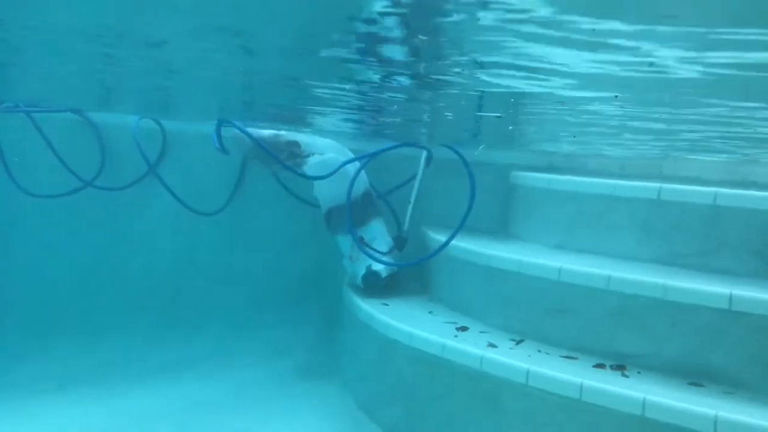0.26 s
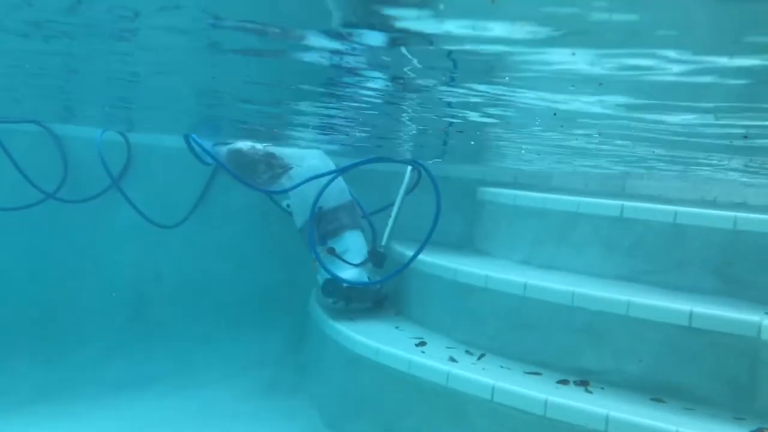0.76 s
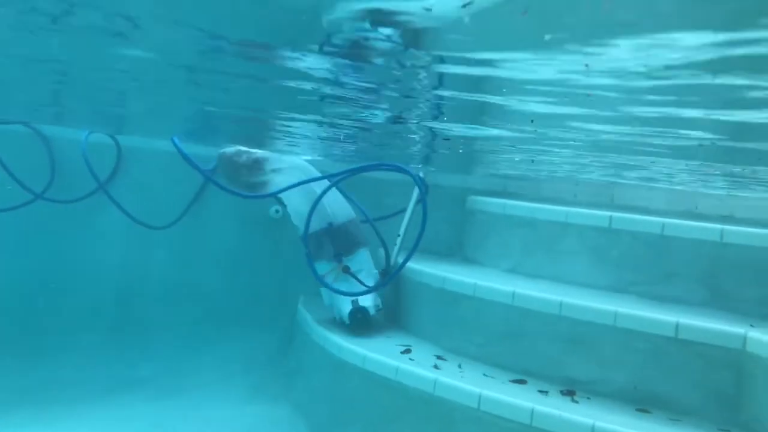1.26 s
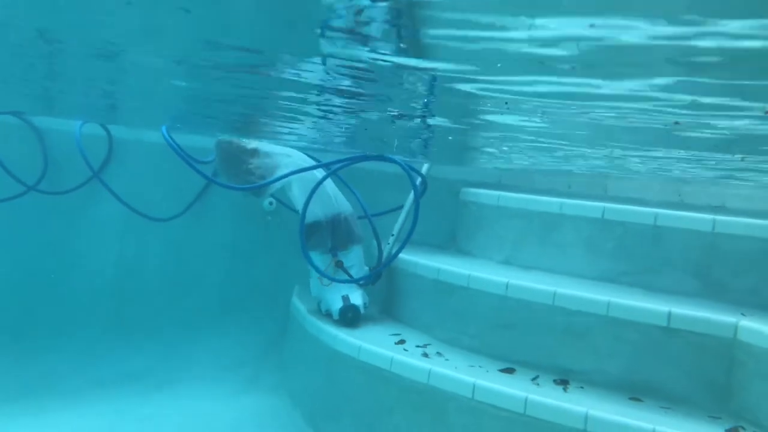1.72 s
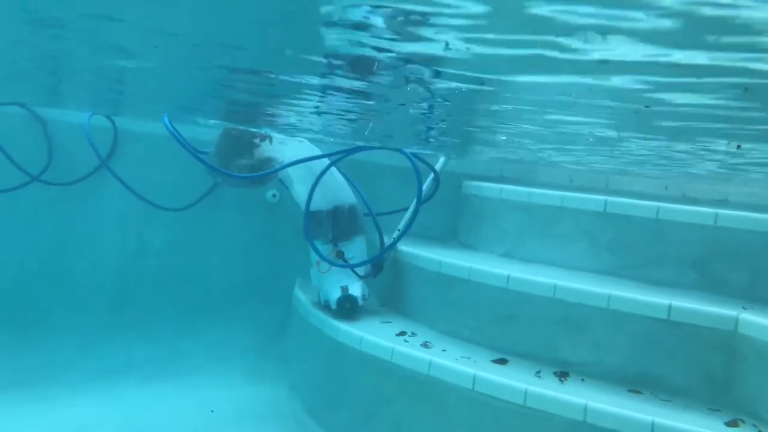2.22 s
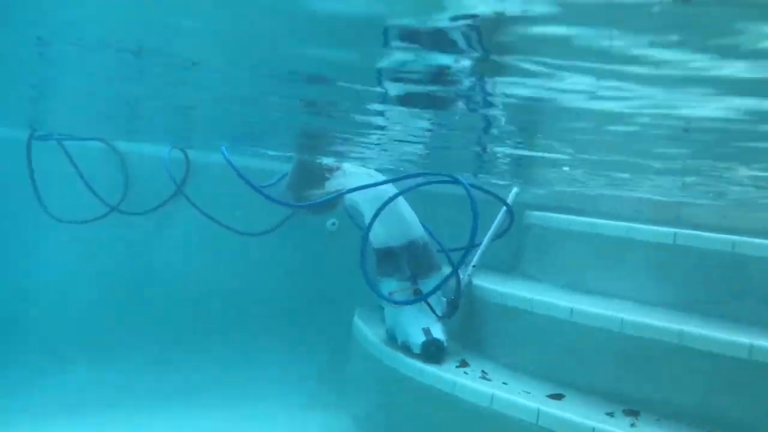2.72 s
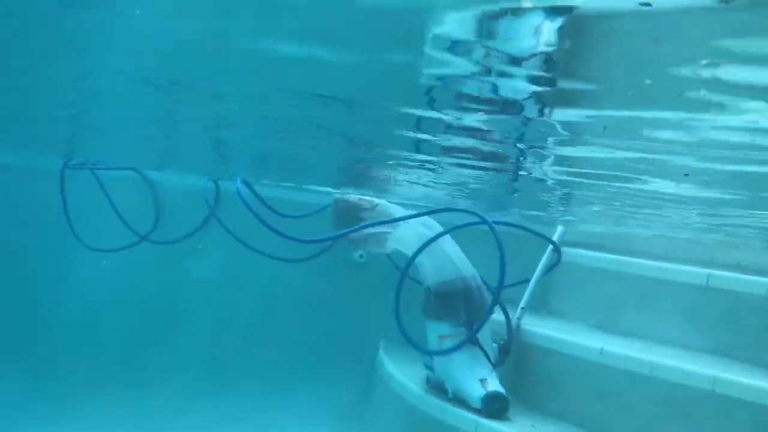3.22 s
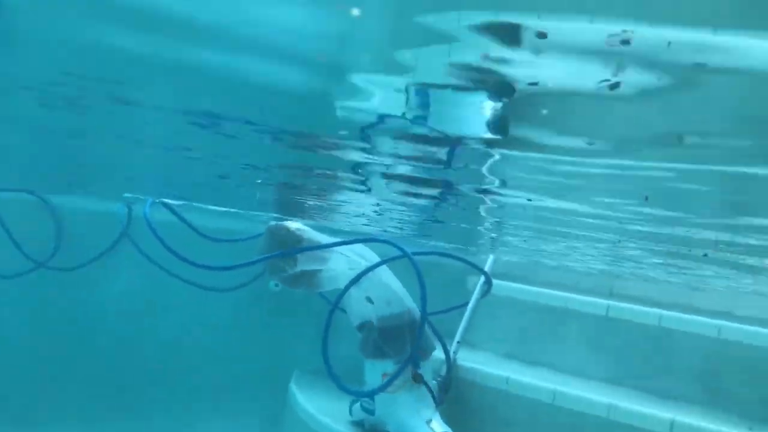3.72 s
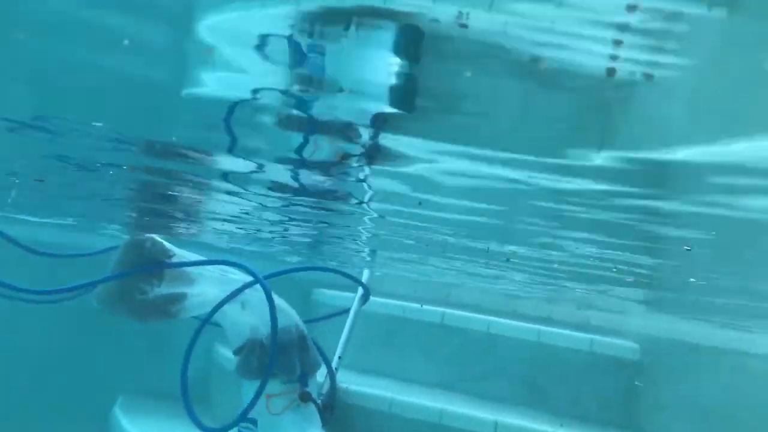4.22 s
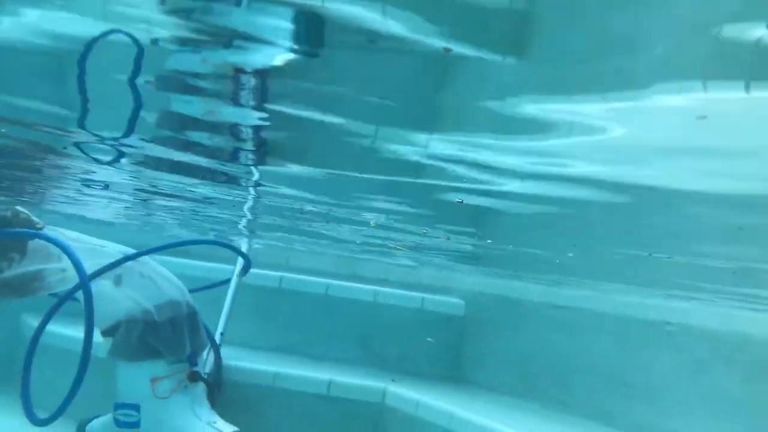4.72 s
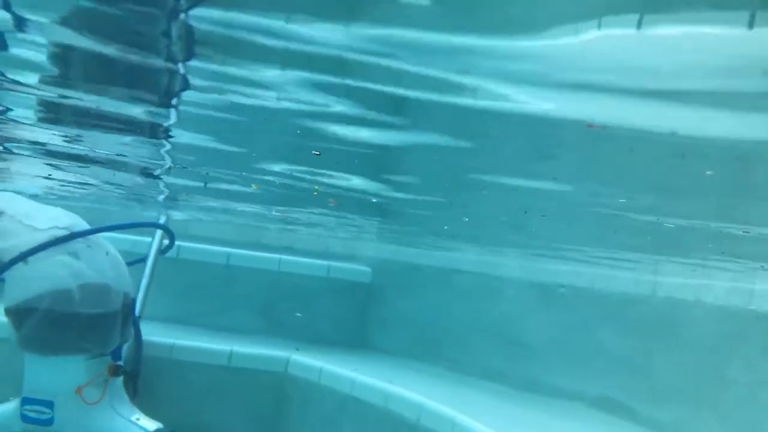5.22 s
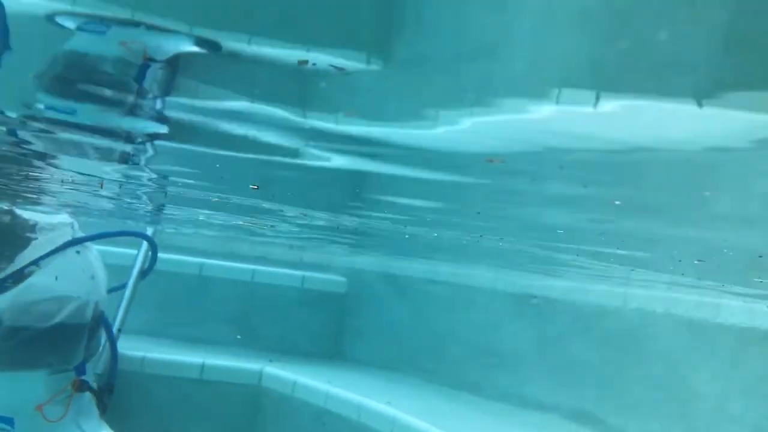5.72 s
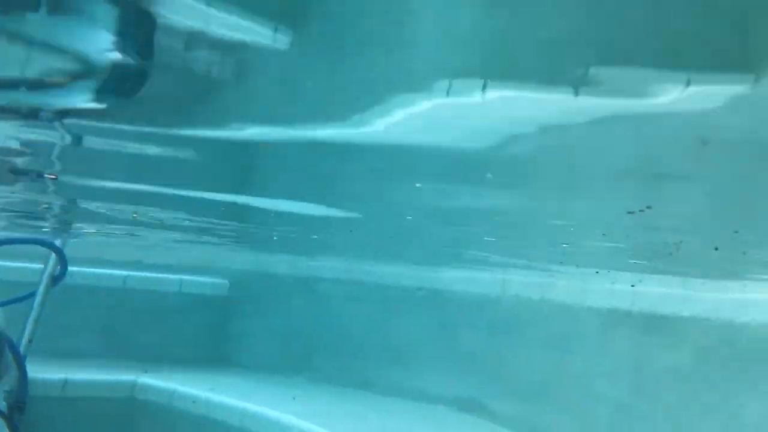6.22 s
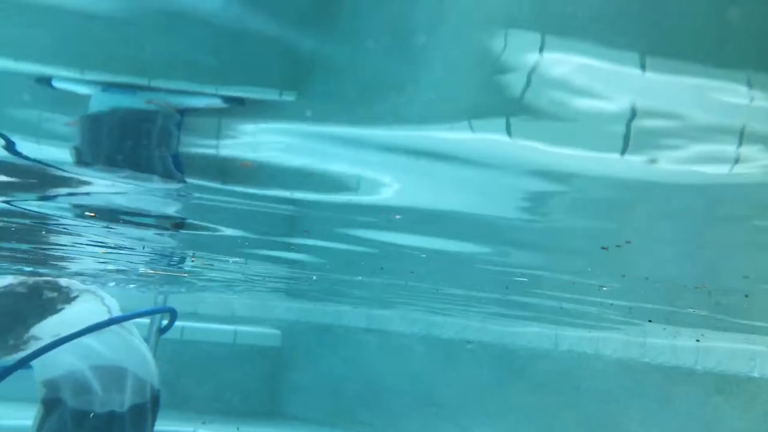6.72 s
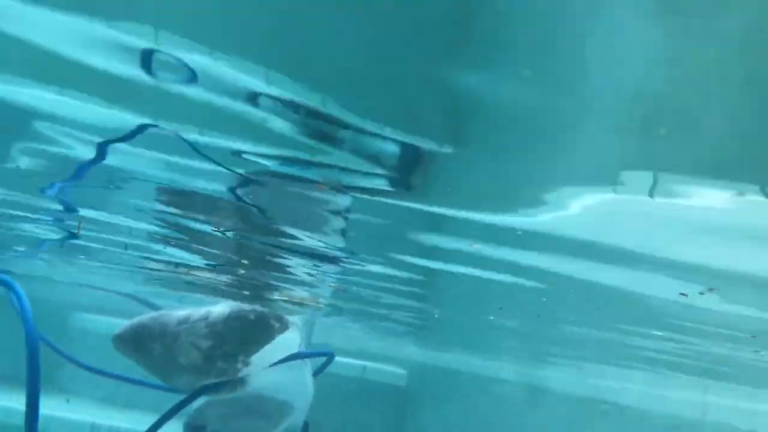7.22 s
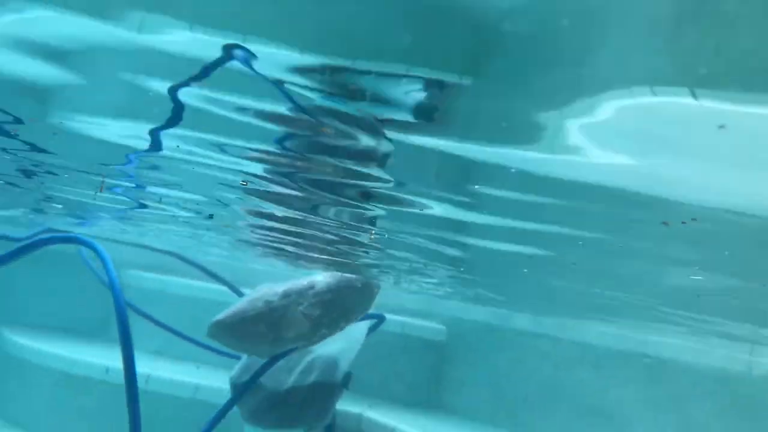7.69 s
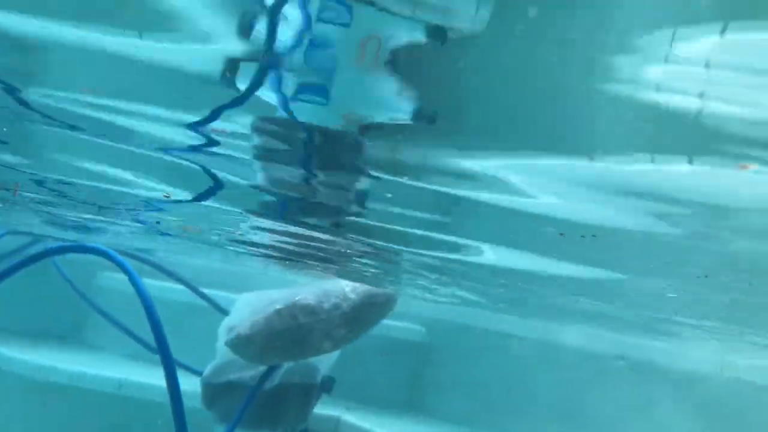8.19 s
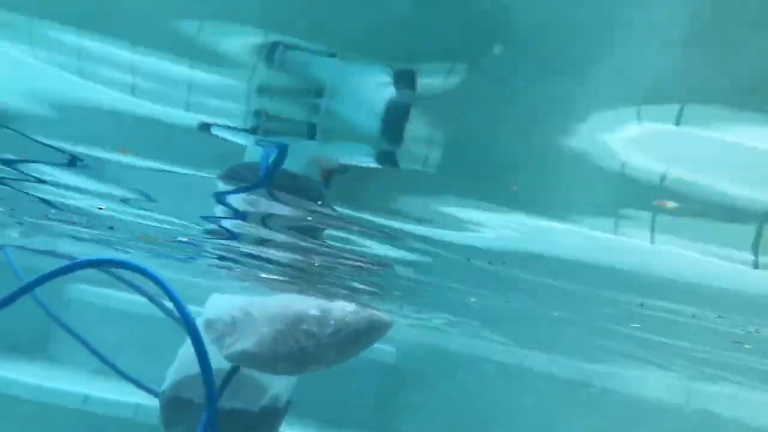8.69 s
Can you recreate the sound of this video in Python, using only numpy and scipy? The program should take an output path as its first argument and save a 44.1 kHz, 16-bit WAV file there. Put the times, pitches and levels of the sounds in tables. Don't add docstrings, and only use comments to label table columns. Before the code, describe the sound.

A continuous gritty pump rush, with a nasal whine around one kilohertz and fine hiss above, fills the whole nine seconds, heard close and boxy from inside a sealed case underwater in a pool. At 0.4 s comes a light knock and soft rubbing, with watery thumps and a faint sliding squeak until about 1.6; a hard knock lands at 1.4. It is calmer until 2.7, when a very loud knock opens a busy stretch of bumps, rubs, ticks and taps lasting to about 4. Sparse clicks and clinks follow. At 5.2 a loud multiple bump with a short scrape hits. From 5.85 to 6.6 there are knocks, bubble pops and low gulps; from 6.7 to 7.1 a rapid rattling clatter with deep thumps. Afterward only small ticks, bubbles and the duller, shifting rush remain, with low rumbling swelling near the end. The background dips briefly after hard hits.

```python
import sys
import numpy as np
from scipy import signal
from scipy.fft import rfft, irfft, next_fast_len
from scipy.io import wavfile
from scipy.ndimage import uniform_filter1d

SR = 44100
rng = np.random.default_rng(int(sys.argv[2]) if len(sys.argv) > 2 else 0)


def gain_from_decibels(decibels):
    exponent = np.asarray(decibels, float) / 20
    return 10 ** exponent


def materialize(psi):
    bounded = np.clip(np.atleast_2d(psi).T, -1, 1)
    quanta = np.round(bounded * 32767).astype(np.int16)
    wavfile.write(sys.argv[1], SR, quanta)


N = 394694

# (frequency [Hz], width [Hz], level [dB])
SHELL = [(57.7, 46, 3), (148.5, 69, -2.5), (210, 75, 0.5), (252, 94, -0.5), (490, 92, -2.5),
         (669, 90, -4.5), (750, 214, -10)]
CAVITY = [(1033, 87, 10.5), (1124, 167, -2.5), (1203, 108, 0.5)]
WINDOW = [(1250, 125, 7.5), (1430, 41, 2.5), (1521.4, 67, 2), (1689, 90, -1)]
FRAME = [(1970, 440, 6), (2170, 317, 7.5), (2700, 330, -7), (3240, 330, -5), (3370, 1420, -13)]
# (frequency [Hz], width [Hz], level [dB])
PORT = [(1180, 31, 0)]
# (frequency [Hz], width [Hz], level [dB])
HUM = [(239.6, 15, 0)]
# (frequency [Hz], width [Hz], level [dB])
FINGERED_FRAME = [(2090, 94, 2), (2380, 96, -4), (2700, 17, -6), (3270, 22, -12), (4360, 64, -18),
                  (5320, 96, -24)]
# (frequency [Hz], width [Hz], level [dB])
PALM_MODES = [(2650, 290, 2), (3270, 180, 2.5), (4450, 520, -14), (5430, 420, -15)]
# (frequency [Hz], width [Hz], level [dB])
RIM_MODES = [(1675, 72, 2), (1810, 110, -9)]

# (frequency [Hz], density [dB per Hz])
FIZZ = [(2350, -30), (4000, -14), (4540, -4), (4900, -16), (5600, -3.5), (6630, -13), (8550, -5.5),
        (10100, -14.5), (11400, -22), (12800, -11), (16000, -35)]
FIZZ_AWAY = [(2350, -27), (4000, -5.5), (5730, -16), (6550, -18.5), (8310, -11), (10500, -15.5),
             (10800, -10), (11700, -7), (12600, -14.5), (13500, -18), (15700, -21), (16000, -31)]
# (frequency [Hz], density [dB per Hz])
CRACK = [(2500, 9), (4000, 0), (7100, -8.5), (8300, -6), (9800, -12.5), (11800, -10.5), (13200, -15),
         (15900, -21)]

# (time [s], turn away from the pump [0-1.3], stirring of the water [dB])
HAND = [(0, 0.3, 2.5), (.79, 0.29, 0.5), (1.39, 0.33, 1), (2.34, 0.29, 2.5), (2.99, 0.26, 10.5),
        (3.32, 0.32, 7), (3.9, 0.23, 5.5), (4.29, 0.32, 4), (5.06, 0.59, 4), (5.43, 0.47, 2),
        (5.96, 0.69, 6), (6.25, 0.58, 4.5), (6.45, 0.6, 1.5), (6.86, 0.69, 5), (7.25, 0.89, 4),
        (8.23, 0.78, 1.5), (8.6, 1, 6.5), (8.95, 1.12, 13.5)]
# (time [s], frequency [Hz])
SQUEEZE = [(0.0, 1109), (1.99, 1070), (2.64, 1074), (3.99, 1057), (6.48, 1073), (6.88, 1036), (7.13, 1043),
           (8.62, 1053), (8.95, 1044)]
# (time [s], push [dB])
PUSH = [(0, 10), (.67, 6), (1.35, 5.5), (2.49, -6.5), (2.96, 10.5), (3.5, -3), (3.84, -7.5), (5.73, 1),
        (5.98, 13), (6.45, 8), (6.83, 17), (7.2, 4.5), (8.57, 9.5), (8.95, 16.5)]
# (best level [dB], best turn [1], loss [dB per turn squared],
# share of stirring [1])
FACING = [
    (-27.5, .01, 4.5, 0.1),
    (-29, 0.74, 37.5, 0.18),
    (-25, 1.562, 9.5, 0.086),
    (-46.5, 0.56, 24.5, 0.9),
]
# (rest level [dB], share of push [1], share of stirring [1],
# tilt [dB per turn])
ROCKING = [
    (-46.5, 0.44, -0.34, 3),
    (-45.5, 0.89, 0.12, -11.5),
    (-48, 0.022, -0.044, 9),
]

# (time [s], frame level [dB], length [s],
# relative treble [dB])
RUBS = [(0.398, -49.5, 0.61, -9), (0.659, -43, 0.24, -13.5), (1.405, -37, 0.018, -23),
        (2.718, -25.5, 0.057, -13), (2.776, -41.5, 0.11, -24), (2.94, -36.5, 0.047, -11),
        (3.283, -51.5, 0.017, 7), (3.406, -36, 0.054, -18), (3.448, -33, 0.052, -27),
        (3.47, -30, 0.046, -15.5), (3.589, -38.5, 0.013, -12), (5.209, -28, 0.07, -15),
        (5.239, -36.5, 0.13, -13), (5.872, -36.5, 0.047, -20), (6.082, -39.5, 0.038, -9.5),
        (6.442, -36.5, 0.18, -18), (6.514, -40, 0.031, -17), (6.695, -28, 0.022, -23),
        (6.755, -36, 0.06, -15), (6.836, -29.5, 0.067, -14), (6.909, -27.5, 0.052, -19),
        (6.945, -44, 0.008, -24),
        (3.285, -53, 0.02, -11),
    (3.589, -44, 0.054, -23),
    (3.69, -50.5, 0.022, -8),
    (3.879, -48, 0.022, -3),
    (6.699, -40, 0.046, -9),
    (6.775, -37.5, 0.076, -24),
    (6.852, -35.5, 0.17, -16),
    (6.901, -38, 0.022, -17),
    (6.956, -45, .035, -22),
]
# (time [s], peak [dB], pitch [Hz], rattle T60 [s])
KNOCKS = [(.388, -16.5, 1197, 0.23), (1.384, -3, 1496, 0.062), (2.721, -2.5, 1070, 0.099),
          (2.76, -6.5, 1134, 0.061), (2.96, -10.5, 1147, 0.074), (2.982, -12.5, 1060, 0.063),
          (3.417, -13.5, 1047, 0.1), (3.454, -7, 1180, 0.034), (3.479, -6.5, 1010, 0.071),
          (3.497, -3.5, 1070, 0.048), (3.575, -19, 1220, 0.023), (3.76, -9.5, 1060, 0.088),
          (3.826, -13, 1060, 0.074), (3.922, -11, 1050, 0.095), (4.486, -13, 1070, 0.064),
          (5.221, -9.5, 766, 0.06), (5.218, -1, 1430, 0.05), (5.218, -3.5, 920, 0.022),
          (5.257, -7, 1030, 0.07), (6.034, -13.5, 1500, 0.098), (6.065, -8, 1155, 0.048),
          (6.164, -6.5, 1460, 0.16), (6.519, -11.5, 1500, 0.045), (6.523, -11, 1320, 0.041),
          (6.686, -14.5, 1290, 0.032), (6.756, -13.5, 1430, 0.1), (6.837, -12.5, 1280, 0.06),
          (6.889, -8, 1320, 0.03), (6.929, -7, 990, 0.015)]
# (time [s], peak [dB], pitch [Hz])
RATTLES = [(1.401, -18, 1140), (2.7271, -5.5, 1060), (2.699, -15, 1120), (2.765, -9.5, 1100),
           (3.486, -20, 1070), (5.212, -8, 1130), (5.224, -1.5, 1300), (5.232, -5, 1250),
           (6.695, -8.5, 1250), (6.775, -9.5, 1230), (6.862, -10, 1310), (6.918, -14, 1420),
           (6.933, -9.5, 1060), (6.964, -14, 1310), (7.04, -13, 1250)]
# (time [s], peak [dB])
TAPS = [(1.444, -22), (2.753, -13), (2.898, -19), (2.943, -17), (3.109, -27), (3.184, -27), (3.463, -14),
        (3.543, -34), (3.806, -22), (4.263, -23), (4.461, -18.5), (4.833, -17.5), (5.86, -14),
        (5.913, -13.5), (5.934, -11.5), (6.486, -12)]
# (time [s], peak [dB])
NUDGES = [(3.123, -19), (3.196, -16), (3.2414, -18), (3.2743, -21), (3.312, -20), (3.3357, -15),
          (3.362, -16), (3.599, -16), (3.6324, -23), (3.692, -20), (3.703, -16.5), (3.772, -30),
          (3.9036, -17.5), (4.05, -24)]
# (time [s], peak [dB], pitch [Hz])
FLICKS = [(2.7361, -2.5, 1120), (2.767, -18, 1100), (2.773, -10, 1160), (3.106, -15, 1180),
          (3.4096, -8, 1180), (3.471, -11, 1110), (3.5394, -18, 1200), (3.567, -10, 1250),
          (3.7353, -19, 1210), (3.8036, -11.5, 1170), (3.95, -18, 1170), (4.262, -12.5, 1180),
          (5.1933, -5.5, 1190), (6.485, -9.5, 1250), (5.2611, -10, 1160), (6.571, -19, 1250),
          (6.752, -13, 1370), (6.82, -12, 1400), (6.885, -6.5, 1320), (6.906, -6.5, 1320)]
# (time [s], peak [dB], pitch [Hz])
TICKS = [(1.5284, -28, 2680), (1.5277, -33, 4400), (7.039, -29.5, 4730), (2.7212, -7.5, 2040),
         (2.9425, -23.5, 2240), (3.221, -29, 2150), (3.412, -16.5, 2090), (3.484, -22.5, 2040),
         (3.704, -24.5, 2140), (3.7329, -22.5, 2170), (3.7582, -23.5, 2300), (3.8212, -26.5, 2440),
         (3.921, -14, 2155), (4.26, -26, 2680), (5.2096, -15, 2450), (6.164, -20, 2220),
         (6.9124, -24, 2170), (6.958, -21, 2300), (7.038, -16.5, 2940), (7.166, -30, 2090),
         (8.6116, -33, 2287), (8.739, -35, 2940)]
# (time [s], peak [dB], pitch [Hz])
CLINKS = [(0.3655, -32.5, 3200), (1.3823, -24, 2400), (1.6212, -33, 2170), (2.4926, -31, 2060),
          (2.5526, -28.5, 2010), (3.048, -27.5, 2170), (3.4545, -21, 2170), (3.5954, -26, 2180),
          (3.9486, -26, 2178), (3.9974, -26.5, 2060), (4.4997, -21.5, 2050), (4.7077, -26, 2110),
          (4.9794, -20, 2170), (5.2228, -11, 2110), (5.8646, -21, 2170), (6.485, -31, 2250),
          (6.687, -28.5, 2220), (7.016, -27, 2400), (7.207, -32, 2070), (7.4914, -30.5, 2090),
          (7.9527, -26, 2210), (8.06, -34, 2240)]
# (time [s], peak [dB], pitch [Hz])
CRACKLES = [(2.815, -35, 3300), (2.8959, -31, 2500), (2.9907, -30, 2700), (3.0874, -36, 2380),
            (3.1089, -30.5, 2300), (3.3184, -37, 2470), (3.3793, -37, 3160), (3.498, -24.5, 2300),
            (3.5659, -28, 2350), (3.7983, -41, 2250), (3.9714, -35, 2900), (6.7656, -36, 2680),
            (6.784, -34, 2210), (6.8364, -28, 2340), (6.8628, -29, 2320), (6.9053, -23, 2230),
            (6.9192, -19, 2170), (6.968, -33, 2700), (7.016, -31, 2600), (7.031, -29, 2650),
            (7.0694, -35, 2600), (7.0893, -35, 2320)]
# (time [s], peak [dB], pitch [Hz])
STRAYS = [(0.048, -37, 2640), (0.1381, -54, 2610), (0.3027, -49, 2660), (0.4933, -45, 2780),
          (0.5357, -42, 3330), (0.607, -39, 3270), (0.7542, -35, 2660), (1.0036, -50, 2820),
          (1.0904, -39, 3270), (1.3054, -42, 2600), (1.3359, -41, 2640), (1.6846, -44, 2650),
          (1.941, -45, 3050), (2.1191, -42, 2600), (2.3131, -43, 2730), (2.4004, -42, 2670),
          (5.3258, -32, 2755), (5.4281, -45, 2745), (5.7553, -47, 2597), (5.8272, -38, 3680),
          (5.9354, -39, 2730), (5.9708, -36, 2710), (6.0901, -39, 2650), (6.2118, -37, 2760),
          (6.4602, -36, 2700), (7.3153, -46, 2710), (7.4006, -45, 3130), (7.9137, -33, 2300),
          (8.1095, -41, 2780), (8.2671, -42, 2970), (8.4073, -41, 2867), (8.4467, -43, 2890)]
# (time [s], peak [dB], pitch [Hz])
PINGS = [(.056, -45, 5230), (.2668, -41, 4100), (.322, -46, 4560), (.793, -42, 4160), (0.864, -35, 2500),
         (2.0646, -31, 2530), (3.2377, -37, 2700), (3.858, -36, 3680), (4.1024, -38, 2770),
         (4.563, -43, 2580), (5.294, -35, 3270), (6.985, -44, 5300), (7.5433, -41, 2570),
         (7.565, -33.5, 2630), (7.9702, -45, 3210), (8.139, -39, 3050)]
# (time [s], peak [dB])
SNAPS = [(.165, -41), (.174, -43), (.22, -44), (.366, -44), (.4025, -36.5), (1.3808, -29), (1.5264, -27),
         (2.0622, -36), (2.7217, -16), (2.7691, -26), (2.9412, -30), (2.9627, -31), (3.1832, -36),
         (3.237, -32), (3.3787, -32), (3.4101, -26.5), (3.4506, -30), (3.7559, -26.5), (3.8182, -33),
         (3.9195, -32.5), (3.9694, -33), (4.2607, -31.5), (4.4892, -36), (5.0704, -37), (5.887, -37),
         (6.0636, -30), (6.1619, -35), (6.9551, -26), (7.0374, -27), (7.0868, -32.5), (7.1651, -30),
         (8.6103, -32), (8.7375, -28.5)]
CREAKS = [0.0, 0.424, 0.695, 2.9287, 2.949, 3.2894, 3.4775, 3.491, 3.503, 3.6057, 4.979, 5.2093, 5.219,
          5.242, 5.259, 5.293, 6.5091, 6.6124, 6.6937, 6.764, 6.782, 6.8409, 6.853, 6.865, 6.884, 6.9102,
          6.93, 8.2325, 8.6323]
# (time [s], peak [dB], pitch [Hz])
THUMPS = [(0.541, -26.5, 225), (0.628, -25, 247), (.669, -22.5, 243), (0.718, -32, 250), (1.017, -35, 75.4),
          (1.051, -30, 152), (1.39, -26, 212), (1.75, -35, 68.5), (2.19, -35.5, 76), (2.69, -24, 212),
          (2.723, -22, 160.5), (2.948, -26.5, 168), (3.098, -31.5, 164), (3.469, -26, 291),
          (3.596, -32, 299), (5.88, -25, 167), (5.92, -26, 240), (5.99, -28, 225), (6.465, -26.5, 243),
          (6.525, -26.5, 228), (6.698, -19, 224), (6.764, -22.5, 248), (6.85, -26, 232), (6.89, -18, 247),
          (7.097, -22, 44.7), (7.388, -25, 53), (8.76, -27, 238)]
# (time [s], peak [dB], pitch [Hz])
SLAPS = [(0.405, -23.5, 236), (0.451, -27, 250), (0.741, -35, 416), (.82, -31, 443), (0.912, -30, 457),
         (1.115, -30, 275), (1.329, -31, 280), (1.38, -26.5, 445), (2.684, -26, 305), (2.74, -22, 300),
         (2.77, -34, 295), (2.941, -36, 302), (3.106, -33.5, 328), (3.413, -27, 300), (3.5, -33, 198),
         (3.552, -27, 167), (4.756, -36, 286), (4.979, -31, 280), (5.153, -38, 292), (5.218, -20, 410),
         (5.84, -29, 234), (5.961, -23, 65), (6.665, -25, 90), (7.916, -30, 285), (8.774, -27, 310)]
# (time [s], peak [dB], pitch [Hz], T60 [s])
POPS = [
    (.49, -23, 890, 0.032),
    (.77, -30, 620, 0.062),
    (6.06, -27, 350, 0.046),
    (6.162, -24, 408, 0.047),
]
# (time [s], peak [dB])
GULPS = [
    (1.016, -26),
    (1.207, -32),
    (6.273, -23),
    (6.361, -33),
    (6.412, -24),
    (6.575, -30),
    (6.61, -30),
    (5.887, -24.5),
]


def evened(x):
    return x / np.sqrt(np.mean(x ** 2) + 1e-20)


def peaked(x):
    return x / np.max(abs(x))


def add(mix, s, sound):
    part = mix[max(round(s * SR), 0):][:len(sound)]
    part += sound[:len(part)]


def lit(levels_db, sounds):
    return sum(gain_from_decibels(db) * x for db, x in zip(levels_db, sounds))


def follow(table):
    s, *columns = np.transpose(table)
    return [np.interp(np.arange(N) / SR, s, column) for column in columns]


def ring(modes, size=8192):
    t = np.arange(size) / SR
    out = np.zeros(size)
    for k, (hz, width, db) in enumerate(modes):
        decay = width ** 2 * t * np.exp(-1.5 * np.pi * width * t)
        out += (-1) ** k * gain_from_decibels(db) * decay * np.sin(2 * np.pi * hz * t)
    return out / np.linalg.norm(out)


def through(x, modes):
    return signal.oaconvolve(x, ring(modes))[:len(x)]


def treble(x, spectrum=CRACK):
    size = next_fast_len(len(x), True)
    hz = np.fft.rfftfreq(size, 1 / SR)
    f, db = np.transpose(spectrum)
    shape_db = np.interp(np.log(hz + 1), np.log(f), db, -90, -90)
    return irfft(rfft(x, size) * gain_from_decibels(shape_db), size)[:len(x)]


def scrambled(x):
    return x * rng.choice([-1., 1.], len(x))


def grit(size, per_s, spread_db, share):
    heights = gain_from_decibels(spread_db * np.minimum(rng.exponential(1, size), 4))
    clicks = heights * (rng.random(size) < per_s / SR)
    clicks = evened(clicks * rng.choice([-1., 1.], size))
    return np.sqrt(share) * clicks + np.sqrt(1 - share) * rng.standard_normal(size)


def flutter(hz, depth_db):
    low_pass = signal.butter(2, hz, fs=SR)
    slow = signal.lfilter(*low_pass, rng.standard_normal(N + SR))[SR:]
    return evened(gain_from_decibels(depth_db * np.clip(evened(slow), -3, 1.8)))


def pump_fizz(turn, bubbles):
    facing_db, away_db, full_turn = -65, -63, 0.95
    angle = np.clip(turn / full_turn, 0, 1) * np.pi / 2
    facing = evened(treble(scrambled(bubbles), FIZZ))
    away = evened(treble(grit(N, 500, 3.0, 0.15) * flutter(35, 1.3), FIZZ_AWAY))
    return gain_from_decibels(facing_db) * np.cos(angle) * facing + gain_from_decibels(away_db) * np.sin(angle) * away


def cavity_ring(drive, squeeze_hz):
    wander_hz, span = 22, round(0.12 * SR)
    waver = evened(uniform_filter1d(uniform_filter1d(drive, span), span))
    turning = np.exp(2j * np.pi * np.cumsum(squeeze_hz + wander_hz * waver) / SR)
    tone = signal.hilbert(through(drive * flutter(29, 0.75), CAVITY), next_fast_len(N))[:N]
    return (tone * turning).real


def pump():
    rest_hz, port_db, port_db_per_hz = 1060, -66, 0.6838
    gap_hz, gap_width_hz, gap_depth = 1915, 31, 0.42
    turn, stir = follow(HAND)
    squeeze_hz = follow(SQUEEZE)[0] - rest_hz
    drive = grit(N, 700, 0.94, 0.2415)
    bubbles = grit(N, 300, 3.2, 0.073) * flutter(18, 2.0)
    levels = [db - loss_db * (turn - best) ** 2 + share * stir for db, best, loss_db, share in FACING]
    levels.append(port_db + port_db_per_hz * squeeze_hz)
    rush = lit(levels, (cavity_ring(drive, squeeze_hz), through(drive, WINDOW[:2]),
                        through(drive, WINDOW[2:]), through(bubbles, FRAME), through(drive, PORT)))
    gap = signal.iirpeak(gap_hz, gap_hz / gap_width_hz, SR)
    rush = rush - gap_depth * signal.filtfilt(*gap, rush)
    edge = signal.cheby2(7, 12, 925, "high", fs=SR, output="sos")
    return pump_fizz(turn, bubbles) + signal.sosfilt(edge, rush)


def rub(s, frame_db, length, treble_db):
    ragged_db, squeak = 3.2, [(3030, 800, 0)]
    t = np.arange(round(length * SR) + 3000) / SR
    grip = (1 - np.exp(-t / (0.16 * length))) * gain_from_decibels(-350 * np.maximum(t - 0.46 * length, 0))
    uneven = evened(uniform_filter1d(rng.standard_normal(len(t)), size=260))
    slip = grit(len(t), 900, 3.0, 0.6) * grip * evened(gain_from_decibels(ragged_db * uneven))
    bright = treble(scrambled(slip))
    bright *= np.linalg.norm(slip) / np.linalg.norm(bright)
    skin = 0.82 * through(slip, FRAME) + 0.72 * through(slip, FINGERED_FRAME)
    skin += 0.43 * through(scrambled(slip), squeak) + gain_from_decibels(treble_db) * bright
    body = 1.5 * through(slip, CAVITY + WINDOW) + 1.31 * through(slip, SHELL[1:])
    return s, gain_from_decibels(frame_db) * (skin + body)


def knock(s, db, hz, t60):
    t = np.arange(3072) / SR
    blow = 0.04 * rng.standard_normal(len(t)) * gain_from_decibels(-60 * t / t60)
    blow[0] = 1
    upper = through(blow, [(hz, 6.8 / t60, 0)]) + 0.61 * through(blow, CAVITY + WINDOW)
    return s - 0.0006, gain_from_decibels(db) * (peaked(upper) + 0.074 * peaked(through(blow, SHELL[2:])))


def flick(s, db, hz):
    width_hz = 213
    return s - 0.0008, gain_from_decibels(db) * peaked(ring([(hz, width_hz, 0)], size=1024))


def tick(s, db, hz, pure, t60):
    sag, sag_s = 0.0597, 0.00634
    t = np.arange(2048) / SR
    fade = gain_from_decibels(-60 * t / t60)
    spray = rng.standard_normal(len(t)) * fade * (1 - np.exp(-t / 0.00067))
    phase = 2 * np.pi * hz * (t - sag * sag_s * np.exp(-t / sag_s))
    mode = np.sin(phase) * fade * (1 - np.exp(-t / 0.00039))
    wide = peaked(through(spray, [(hz, 700, 0), (3300, 1200, -9)])) + 0.17 * peaked(treble(spray))
    return s, gain_from_decibels(db) * peaked(pure * peaked(mode) + (1 - pure) * wide)


def snap(s, db):
    seal_share_per_turn = 0.15
    t = np.arange(1536) / SR
    decay = gain_from_decibels(-60 * t / 0.011) + 0.089 * gain_from_decibels(-60 * t / 0.12)
    crack = rng.standard_normal(len(t)) * (1 - np.exp(-t / 0.0012)) ** 2 * decay
    times, turns, _ = np.transpose(HAND)
    high = seal_share_per_turn * np.interp(s, times, turns)
    bright = (1 - high) * peaked(treble(crack)) + high * peaked(treble(crack, FIZZ_AWAY[3:]))
    return s - 0.0005, gain_from_decibels(db) * bright


def slide(s, length, db, modes):
    t = np.arange(round(length * SR)) / SR
    broken = gain_from_decibels(3.4 * evened(uniform_filter1d(rng.standard_normal(len(t)), size=900)))
    arch = np.sin(np.pi * (t / length) ** 0.86) ** 0.69
    return s, gain_from_decibels(db) * arch * broken * through(grit(len(t), 830, 2.1, 0.4), modes)


def thump(s, db, hz, t60):
    t = np.arange(8192) / SR
    fade = gain_from_decibels(-60 * t / t60)
    low = peaked(t * fade * np.sin(2 * np.pi * hz * t))
    overtone = peaked(t * fade ** 2 * np.sin(2 * np.pi * 2.1 * hz * t))
    return s - 0.006, gain_from_decibels(db - 4.5) * (low + 0.37 * overtone)


def gulp(s, db):
    from_hz, to_hz, fall_s, t60 = 420, 65, 0.0038, 0.11
    t = np.arange(8192) / SR
    hz = to_hz + (from_hz - to_hz) * np.exp(-t / fall_s)
    fade = (1 - np.exp(-t / 0.0015)) * gain_from_decibels(-60 * t / t60)
    return s, gain_from_decibels(db) * peaked(fade * np.sin(2 * np.pi * np.cumsum(hz) / SR))


def ping(s, db, hz):
    return tick(s, db, hz, 0.5, 0.035)


def swell():
    hum_db, hum_db_per_turn = -66, 22.5
    lumps = [rng.standard_normal(N) * flutter(hz, db) for hz, db in ((7, 3.7), (12, 4.6), (20.5, 2.3))]
    (push,), (turn, stir) = follow(PUSH), follow(HAND)
    levels = [db + a * push + b * stir + c * turn for db, a, b, c in ROCKING]
    hum = gain_from_decibels(hum_db + hum_db_per_turn * turn) * through(scrambled(lumps[0]), HUM)
    return hum + lit(levels, map(through, lumps, (SHELL[:2], SHELL[2:4], SHELL[4:])))


def specks():
    count, level_db, spread_db, cycles = 400, -52.5, 3.5, 13
    low_hz, high_hz = 2300, 9500
    t, out = np.arange(512) / SR, np.zeros(N)
    for when, size, pitch in rng.random((count, 3)):
        hz = low_hz * (high_hz / low_hz) ** pitch
        fade = t * np.exp(-2 * np.pi * hz * t / cycles)
        blip = fade * np.sin(2 * np.pi * hz * t * (1 + 3.2 * t))
        db = level_db - spread_db * np.log(size + 0.02) - 9 * pitch
        add(out, when * N / SR, gain_from_decibels(db) * peaked(blip))
    return out


def scene():
    slot_hz, slot_width_hz, slot_depth = 601, 44, 0.51
    mix = pump() + swell() + specks()
    events = [rub(*row) for row in RUBS]
    events += [knock(*row) for row in KNOCKS]
    events += [knock(*row, 0.033) for row in RATTLES]
    events += [knock(*row, 1038, 0.053) for row in TAPS]
    events += [knock(*row, 1070, 0.11) for row in NUDGES]
    events += [flick(*row) for row in FLICKS]
    # share of pure mode, T60 in s
    events += [tick(*row, 0.36, 0.027) for row in TICKS]
    events += [tick(*row, 0.7, 0.04) for row in CLINKS]
    events += [tick(*row, 0.36, 0.031) for row in CRACKLES]
    events += [tick(*row, 0.34, 0.017) for row in STRAYS]
    events += [snap(*row) for row in SNAPS]
    events += [snap(s, -37.5) for s in CREAKS]
    # start s, length s, dB
    events += [slide(0.33, 0.69, -49, PALM_MODES), slide(0.72, 0.9, -41, RIM_MODES)]
    events += [thump(*row, 0.091) for row in THUMPS]
    events += [thump(*row, 0.055) for row in SLAPS]
    events += [thump(*row) for row in POPS]
    events += [gulp(*row) for row in GULPS]
    events += [ping(*row) for row in PINGS]
    for s, sound in events:
        add(mix, s, sound)
    slot = signal.iirpeak(slot_hz, slot_hz / slot_width_hz, SR)
    return (mix - slot_depth * signal.filtfilt(*slot, mix))[None]


def top_cut(x):
    return signal.sosfilt(signal.butter(12, 15830, fs=SR, output="sos"), x)


def record(dry):
    threshold_db, recovery_db_per_s, duck_share = -10, 20, 0.69
    cut = signal.lfilter(*signal.butter(2, 38, "high", fs=SR), dry)
    power_db = 10 * np.log10(abs(uniform_filter1d(cut[0] ** 2, 400)) + 1e-12)
    fall = np.arange(N) * recovery_db_per_s / SR
    held_db = np.maximum.accumulate(power_db + fall) - fall
    over_db = np.maximum(held_db - threshold_db, 0)
    ducked = cut / gain_from_decibels(duck_share * uniform_filter1d(over_db, 600, origin=299))
    limited = ducked / (1 + ducked ** 8) ** (1 / 8)
    return top_cut(limited)


dry = scene()
out = record(dry)
materialize(out)
```